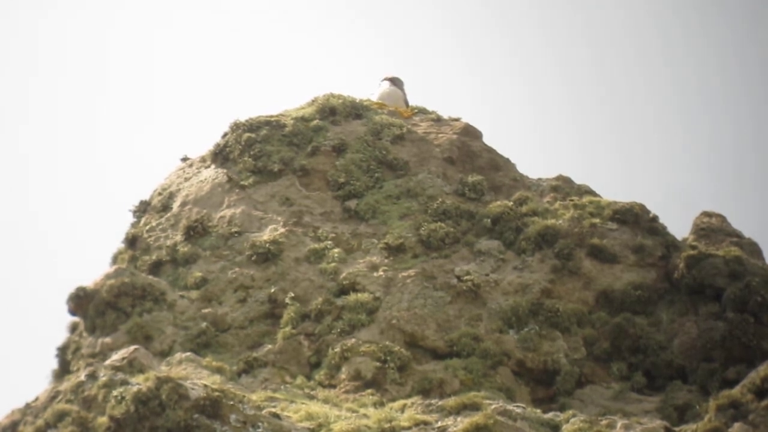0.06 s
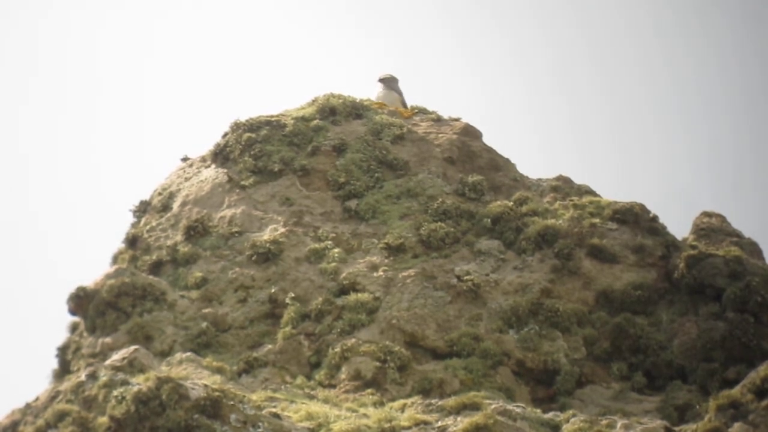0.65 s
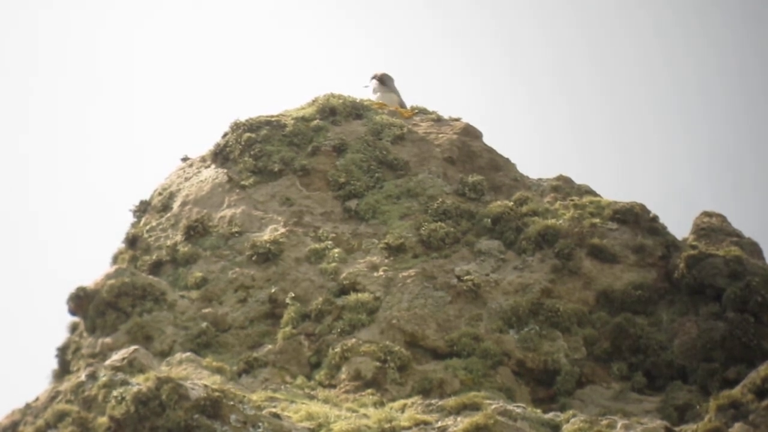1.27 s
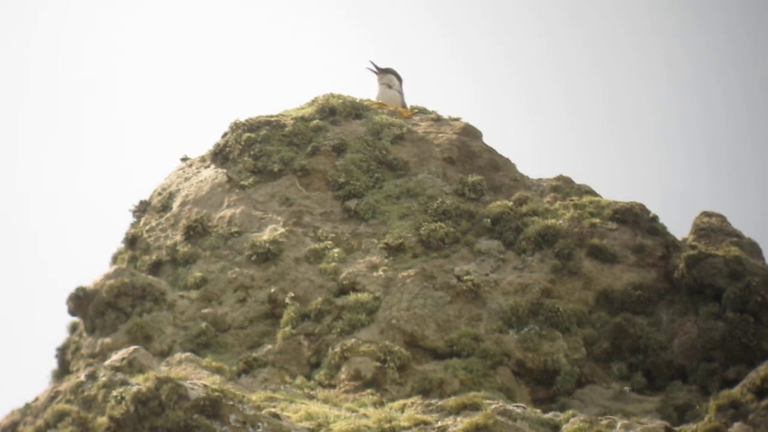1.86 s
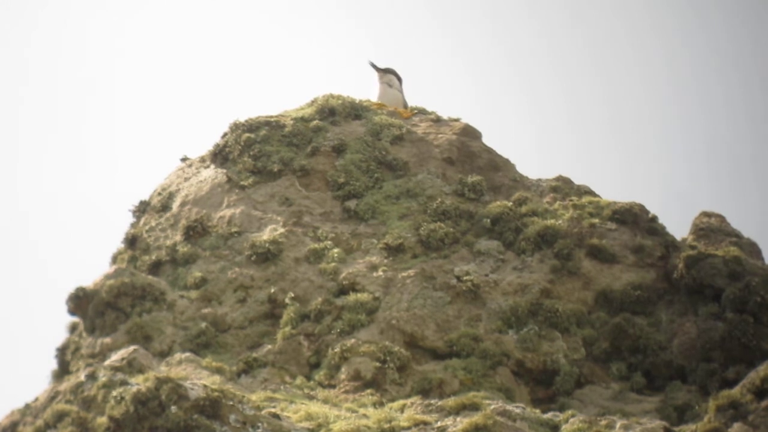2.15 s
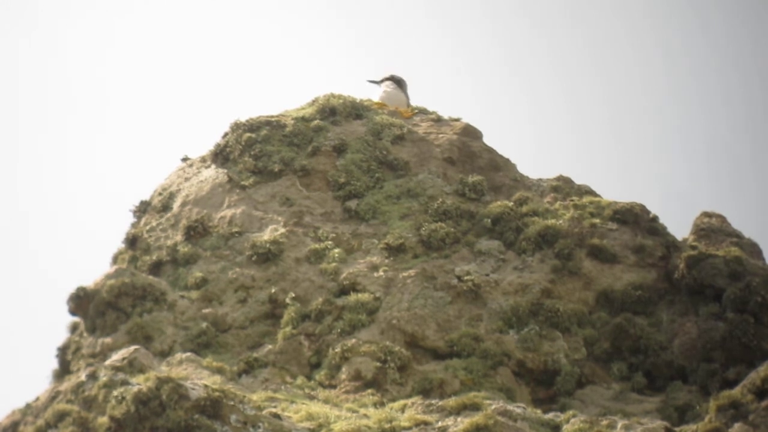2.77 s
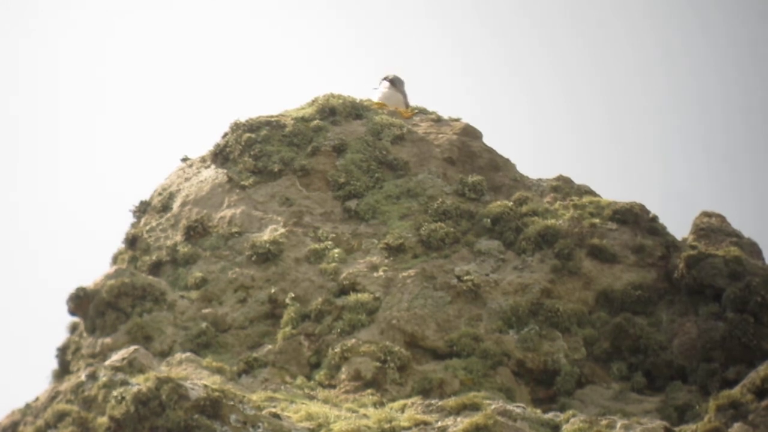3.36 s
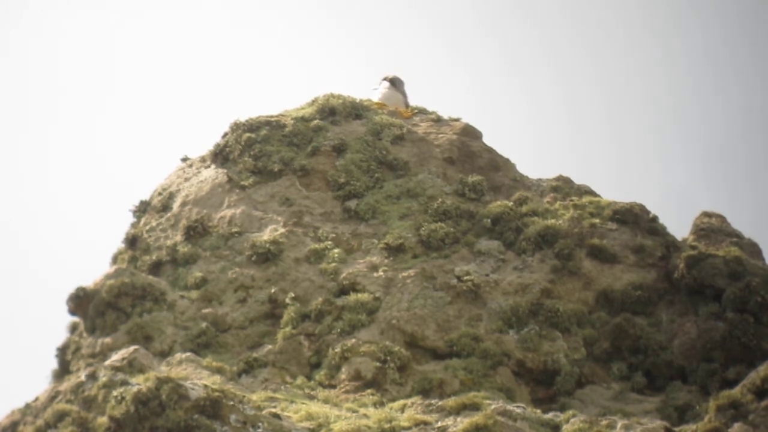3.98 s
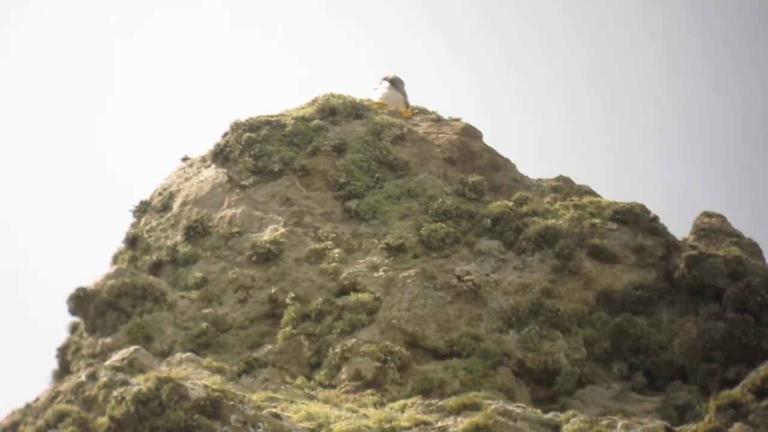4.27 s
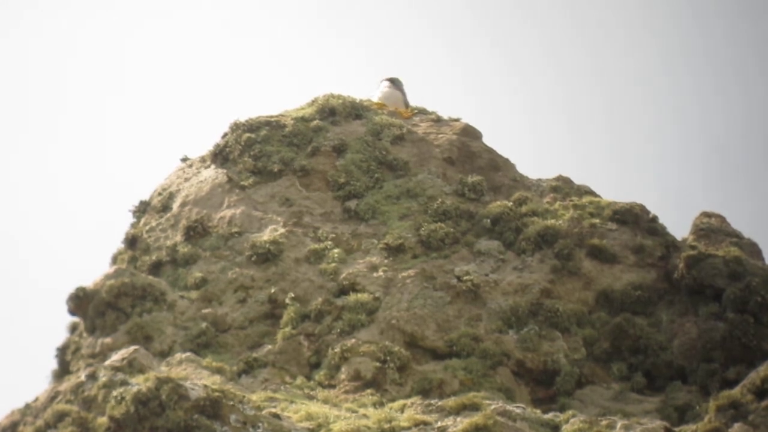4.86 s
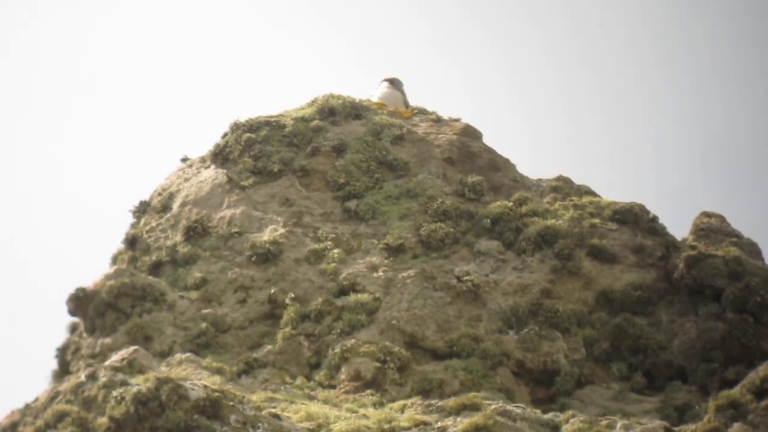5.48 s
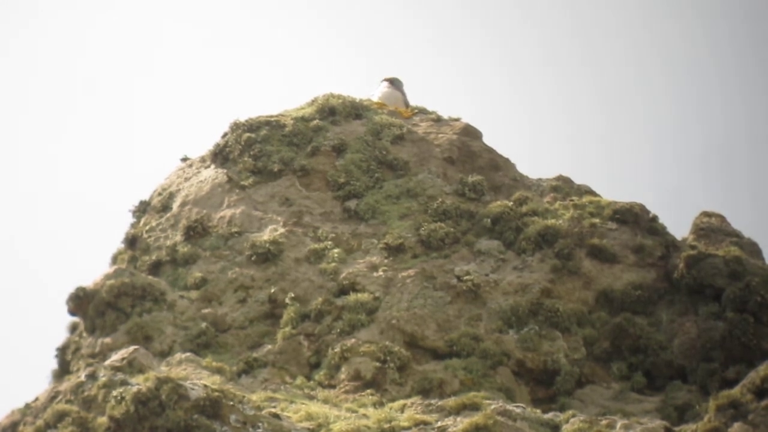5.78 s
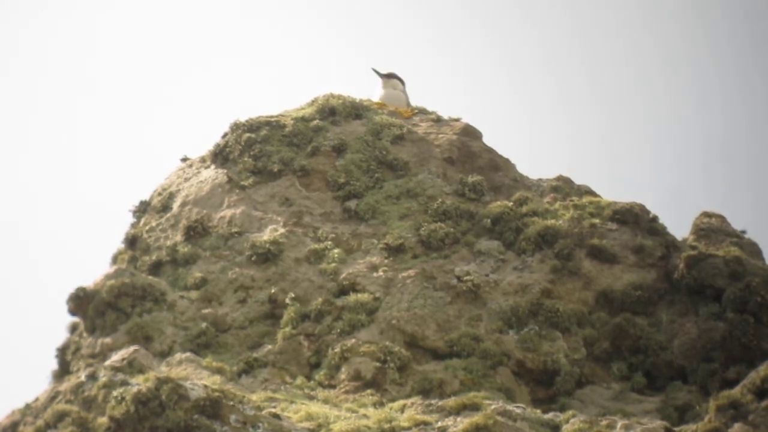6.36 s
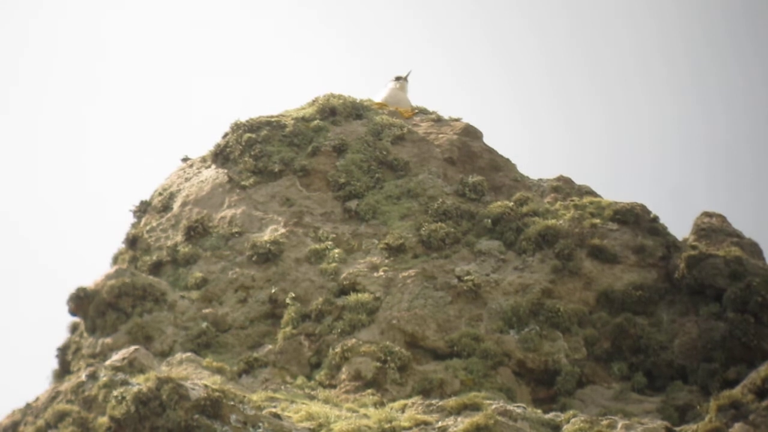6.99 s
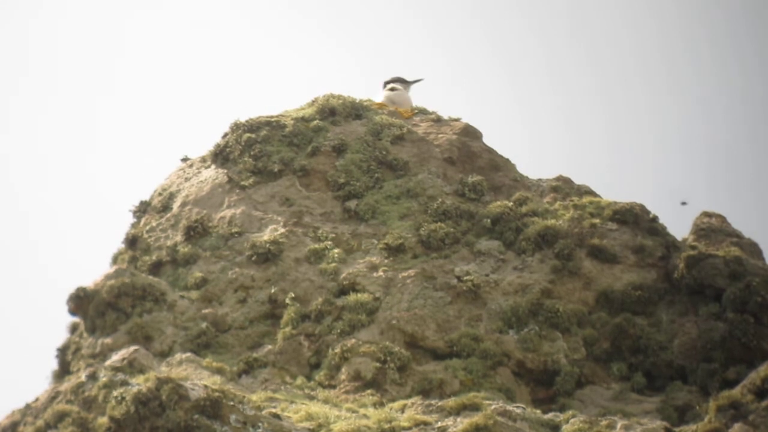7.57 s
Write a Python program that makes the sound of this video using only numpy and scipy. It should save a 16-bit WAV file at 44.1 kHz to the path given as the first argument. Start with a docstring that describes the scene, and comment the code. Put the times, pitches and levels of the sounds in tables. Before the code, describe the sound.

Eight quick, clear bird whistles, then faint faraway chirps, amid gusty wind rumble, softly rushing water and a few sharp camera clicks.

```python
"""Rock nuthatch above a stream

A rock nuthatch on a boulder whistles eight near-sine notes; small birds answer faintly from far off.
A stream rushes down the valley, and gusts buffet the microphone ports with a lumpy rumble.
The hand-held camera clicks, its body ringing, and a sleeve rustles over a bed of hiss.
Gain control ducks after the loudest clicks."""
import sys
import numpy as np
from scipy import signal
from scipy.fft import rfft, irfft, next_fast_len
from scipy.io import wavfile
from scipy.ndimage import uniform_filter1d

SR = 44100
rng = np.random.default_rng(int(sys.argv[2]) if len(sys.argv) > 2 else 0)


def waveform_to_disk(signal):
    """Save audio, clipped to [-1, 1], as 16-bit WAV at the path in sys.argv[1]."""
    frames = np.transpose(np.atleast_2d(signal))
    scaled = np.clip(frames, -1, 1) * 32767
    samples = np.round(scaled).astype(np.int16)
    wavfile.write(sys.argv[1], SR, samples)


N = 340893
TIME = np.arange(N) / SR

# nuthatch notes: (start of hold [s], pitch [Hz], drift over hold [Hz], level at end of hold [dB],
# swell over hold [dB], lead-in chip [dB], left over right [dB])
NOTES = [(.815, 3580, 0, -58.5, -2, -73, 2), (1.038, 3420, -150, -45.5, -0.5, -52, 0.5),
         (1.277, 3216, -90.5, -48.5, -3.5, -50.5, 2), (1.509, 3230, -100, -43, 5.5, -46, 1),
         (1.741, 3280, -110, -39.5, 8, -47.5, -3.5), (1.972, 3183, 63.5, -35, 3.5, -38, -2),
         (2.204, 3240, 136, -37, 2.5, -38.5, -0.5), (2.445, 3170, 110.5, -45, -2, -48.5, .5)]
# the lead-in chip: its pitch ceiling, its pitch at its loudest, and its timing
CHIP_TOP_HZ, CHIP_HZ, CHIP_LEAD_S, CHIP_FALL_S, CHIP_WIDTH_S = 3396, 2754, .064, .017, .0041
SLACK_HZ, SLACK_DB, SLACK_FADE_S = 1475, -9, .028  # after the chip the syrinx goes slack
RISE_LEAD_S, RISE_S, ATTACK_S = .013, .004, .0089  # the sweep up into the whistle
HOLD_S, SAG_HZ, RELEASE_S = .066, 68.6, .003  # the held whistle sags in the middle
FLICK_HZ, FLICK_S = 270, .008  # the closing flick: height at end of hold, time constant
# far birds' slurs: (time [s], length [s], start [Hz], middle [Hz], end [Hz], level [dB])
FAR_SLURS = [(2.525, .045, 4620, 4630, 4560, -63), (2.69, .5, 4660, 4330, 4250, -64),
             (4.14, .15, 1600, 1700, 1800, -54), (4.62, .07, 1700, 1780, 1700, -55),
             (6.92, .07, 2350, 2230, 2200, -54), (7.23, .055, 3800, 2900, 2200, -60),
             (7.48, .09, 2500, 3100, 3550, -62)]
# far birds' arched twitters: (apex time [s], half length [s], apex [Hz], depth [Hz], level [dB])
FAR_TWITTERS = [(5.48, .03, 4100, 500, -63), (5.652, 0.035, 4020, 490, -54.5),
                (5.834, .036, 4190, 736, -51.5), (6.148, .026, 4530, 1710, -54),
                (6.61, .024, 4540, 1510, -53), (6.731, 0.029, 4350, 1390, -54)]
# faint high smears, like echoes of a distant call: (peak time [s], width [s], level [dB])
FAR_CALL_ECHOES = [(.89, .03, -61), (1.23, 0.037, -57.5), (1.36, 0.03, -51.5), (1.55, 0.14, -57.5),
                   (7.0, 0.32, -63.5)]
# their tone: (frequency [Hz], level [dB])
FAR_ECHO_COLOUR = [(1500, -27), (3000, -2), (4200, 0), (5000, 0), (6200, -31), (9000, -56)]

# camera clicks: (time [s], level [dB], tilt [dB/octave], top edge [Hz], decay time constant [s])
CLICKS = [(0.334, -38, 1, 10900, 0.0021), (0.4064, -29, 2, 13000, 0.0069), (0.414, -16, 0.5, 13500, 0.0047),
          (0.4158, -16.5, -1.5, 12100, 0.0038), (0.438, -39, -1, 12000, 0.0049),
          (0.6344, -31, -0.5, 13000, 0.0021), (1.1958, -28.5, -5.5, 6500, 0.00037),
          (1.2725, -28.5, -6.5, 6460, 0.00045), (1.294, -32.5, -5, 6000, 0.0015),
          (1.31, -35, -6, 6000, 0.0014), (1.335, -30.5, -15, 6000, .001), (1.721, -32, 10, 8540, 0.0014),
          (2.2305, -6.5, 6.5, 13200, 0.0012), (2.232, -19, -3, 9200, 0.0035),
          (2.2345, -15, -6, 8900, 0.0011), (2.494, -29, 4, 3020, 0.00076), (3.494, -32, -4, 4450, 0.0016),
          (3.693, -45.5, 12, 7450, .002), (4.008, -29, -8, 1810, 0.0018),
          (5.7654, -38.5, -6.5, 6500, 0.005), (7.024, -36, -6.5, 5490, 0.00089),
          (7.101, -37, -6, 5500, 0.00075)]
# tone of a click: (frequency [Hz], level [dB])
CLICK_COLOUR = [(100, -24), (700, -15), (1300, -6.5), (2300, -0.5), (3200, -2.5), (4300, -1), (5600, -1.5),
                (6600, -0.5), (7600, -11), (9500, -6), (12300, -3.5), (14000, -11), (16000, -18.5)]
# resonances of the camera body: (frequency [Hz], width [Hz], level [dB])
BODY_MODES = [(1565, 50, 16), (2300, 110, 0), (4440, 140, 2), (5350, 160, 1), (5760, 140, 0),
              (6500, 160, -3), (10400, 300, -5)]

# gusts on the ports: (peak time [s], rise [s], fall [s], level [dB], left over right [dB])
GUSTS = [(.8, .22, 0.25, -39.5, -17), (1.63, .03, .17, -46, 0), (3.02, 0.1, .09, -34.5, -12.5),
         (3.24, .03, .04, -43.5, -13.5), (3.65, .03, .1, -39.5, -5), (3.98, .03, 0.062, -25, 4),
         (4.2, .035, .07, -33, -0.5), (4.55, 0.019, .04, -35, 6), (4.74, 0.088, .19, -39, -3),
         (5.25, .03, .08, -43, -3), (6.45, 0.038, .3, -41.5, 4), (7.0, 0.055, 0.057, -31.5, 2.5),
         (7.17, .025, 0.068, -33, 0), (7.43, 0.066, .16, -38.5, -1)]
# single eddies that hit one port: (time [s], level [dB], time scale [s], port)
BUFFETS = [(.587, -21.5, 0.003, "left"), (0.829, -23, 0.0022, "right"), (1.123, -19.5, 0.0038, "right"),
           (1.45, -27, 0.0038, "right"), (2.201, -26, 0.0028, "left"), (2.987, -17.5, 0.001, "right"),
           (3.04, -19.5, 0.0023, "right"), (3.781, -19, 0.0017, "left"), (3.9539, -8.5, .0011, "left"),
           (3.968, -11, .0015, "left"), (4.023, -15, .0015, "right"), (4.212, -18, 0.0018, "right"),
           (6.518, -20.5, 0.0035, "right"), (7.0, -21, 0.00094, "left"), (7.02, -16, .002, "left")]
# tone of slow pressure swings and of small fast eddies: (frequency [Hz], level [dB])
RUMBLE_COLOUR = [(15, -20), (35, -7.5), (60, 1), (110, -16.5), (180, -28.5), (400, -42.5), (4000, -88)]
EDDY_COLOUR = [(20, -16), (70, 4.5), (115, 3), (170, -3.5), (280, -12), (500, -23), (1200, -58),
               (4000, -87)]

# soft slides of the sleeve: (peak time [s], width [s], level [dB])
RUSTLES = [(.19, 0.24, -57), (.62, 0.057, -52), (1.32, 0.052, -55), (1.623, 0.11, -54.5),
           (3.518, 0.099, -50.5), (5.477, 0.049, -54.5), (5.88, 0.2, -58.5), (6.22, 0.1, -48),
           (6.456, 0.065, -51.5), (7.614, 0.036, -54)]
# tone of the slides and of a gritty scuff: (frequency [Hz], level [dB])
RUSTLE_COLOUR = [(300, -36), (1500, 6), (3000, 2.5), (5000, 2), (6000, -3.5), (7500, -9), (10000, -6),
                 (12300, -8), (14000, -14), (16000, -36)]
GRIT_COLOUR = [(500, -25), (1300, -4), (2500, 10), (4000, -12), (6000, -10), (7500, -23), (12000, -30)]

# the stream, carried on the air: (time [s], deep roar [dB], bright rush [dB])
STREAM_LEVELS = np.vstack([[(0.0, -56.5, -49), (1.27, -52, -50.5), (1.89, -49, -45), (2.08, -48.5, -47),
                 (2.2, -52, -47.5)], [(2.65, -54, -46), (2.83, -55, -46.5), (3.13, -54.5, -48),
                 (4.08, -50.5, -48), (5.1, -51, -48), (5.49, -49, -51.5), (6.09, -54, -50),
                 (6.57, -53.5, -51), (6.98, -54.5, -51), (7.73, -54, -51.5)]])
# tone of the roar, the rush and the hiss bed: (frequency [Hz], level [dB])
ROAR_COLOUR = [(20, 7), (120, -15.5), (280, -4.5), (400, -3), (540, 1), (700, -2), (1000, -8), (3000, -38),
               (8000, -67.5)]
RUSH_COLOUR = [(100, -28.5), (500, -14), (800, -3.5), (1050, 0.5), (1400, -6.5), (2000, -11.5), (2600, -24),
               (4000, -41), (8000, -58.5)]
HISS_COLOUR = [(100, 14), (2500, 5), (4000, 2), (5500, -0.5), (7500, -7), (10500, -5), (13000, -8.5),
               (15800, -11)]
# stereo image of the stream and of diffuse noise: (frequency [Hz], left-right likeness [0-1])
STREAM_IMAGE = [(50, 1), (250, 0.84), (450, 0.85), (1050, 0.79), (1500, 0.71), (2200, 1), (3000, 0.26)]
WIDE_IMAGE = [(20, 0.067), (16000, 0.046)]


def nuthatch(level_db=1, jitter=.0072, rasp=.06, flutter_db=3.9):
    """Each note: a falling chip, a hush, a fast rise, a held whistle and an upward flick."""
    out, t = np.zeros((2, N)), np.arange(-.08, .08, 1 / SR)
    waver, flutter, shake = jitter * wander(160), flutter_db * wander(60), wander(600)
    held, risen = np.clip(t / HOLD_S, 0, 1), step(t + RISE_LEAD_S, RISE_S)
    since_chip = t + CHIP_LEAD_S
    falling = np.minimum(SLACK_HZ + (CHIP_HZ - SLACK_HZ) * np.exp(-since_chip / CHIP_FALL_S), CHIP_TOP_HZ)
    scoop = FLICK_HZ * np.exp((t - HOLD_S) / FLICK_S) - SAG_HZ * np.sin(np.pi * held)
    slack = amp(SLACK_DB) * step(since_chip, ATTACK_S) * np.exp(-since_chip / SLACK_FADE_S)
    chip = np.exp(-.5 * (since_chip / CHIP_WIDTH_S) ** 2) + slack
    hold = step(t + RISE_LEAD_S, ATTACK_S) * step(HOLD_S - t, RELEASE_S)
    for s, pitch, drift, db, swell_db, chip_db, side_db in NOTES:
        now = np.round((s + t) * SR).astype(int)
        hz = (1 - risen) * falling + risen * (pitch + drift * held + scoop)
        effort = amp(chip_db) * chip + amp(db + swell_db * (held - 1)) * hold
        # the slack syrinx rasps in the low sweeps, and the throat dulls them
        rough_hz = hz * (1 + waver[now] + rasp * (1 - risen) * shake[now])
        throat = 1 / np.sqrt(1 + (1750 / hz) ** 8)
        add(out, s + t[0], pan(side_db) * effort * throat * whistle(rough_hz, flutter[now]))
    # the boulder doubles the sweeps within a few milliseconds; rocks and valley answer later
    boulder = amp(-7) * reverb(out, t60=.019, delay=.0016)
    rocks = amp(-13) * reverb(out, t60=.2, delay=.0029)
    valley = amp(-19) * reverb(out, t60=.83, delay=.022)
    return amp(level_db) * (out + boulder + rocks + valley)


def whistle(hz, db):
    """The syrinx: a near sine with a very weak octave."""
    phase = 2 * np.pi * np.cumsum(hz) / SR
    return np.sqrt(2) * amp(db) * (np.sin(phase) + amp(-42) * np.sin(2 * phase))


def far_birds(level_db=-3, arch_power=1.8, apex_break_s=.008, downstroke_db=-5):
    """Thin distant slurs and twitters, blurred by the rocks and wet with the echo of the slopes."""
    out = np.zeros((2, N))
    for s, length, *pitch, db in FAR_SLURS:
        u = np.linspace(0, 1, int(length * SR))
        hz = np.polyval(np.polyfit([0, .5, 1], pitch, 2), u)
        envelope = np.interp(u, [0, .15, .5, 1], [0, 1.1, 1, 0])
        add(out, s, pan(0) * envelope * whistle(hz, db))
    for s, half, apex, depth, db in FAR_TWITTERS:
        u = np.linspace(-1, 1, int(2 * half * SR))
        hz = apex - depth * abs(u) ** arch_power
        envelope = (1 - u ** 4) * (1 - np.exp(-(u * half / apex_break_s) ** 2))
        add(out, s - half, pan(0) * envelope * whistle(hz, db + downstroke_db * (u > 0)))
    rocks = amp(-5) * reverb(out, t60=.054, delay=.0011)
    slopes = amp(-3) * reverb(out, t60=3.3, delay=.012)
    return amp(level_db) * (out + rocks + slopes)


def far_call_echoes(level_db=-1, grain_db=1.5):
    """A faint smeared high band, like the echo of a distant bird call."""
    band = noise(FAR_ECHO_COLOUR, WIDE_IMAGE, 3.5)
    return amp(level_db + grain_db * wander(250)) * swells(FAR_CALL_ECHOES) * band


def camera_clicks(centre=.61, crack=.88, side_db=2, tail_db=-19, full_ring_s=.003):
    """A sharp crack and a short chatter ring the camera body, close to both ports."""
    out, size = np.zeros((2, N)), 4096
    t, hz = np.arange(size) / SR, np.fft.rfftfreq(size, 1 / SR)
    modes = sum(amp(db) / (1 + 2j * (hz - f) / width) for f, width, db in BODY_MODES)
    octaves = np.log2(np.maximum(hz, 1300) / 4000)
    for s, db, tilt_db, top_hz, decay in CLICKS:
        shared, *own = rng.standard_normal((3, size))
        snap = (centre * shared + np.array(own)) * np.exp(-t / decay)
        snap[:, 0] = crack * np.linalg.norm(snap[0]) * min(1, .00225 / decay)  # brief clicks crack most
        eq = amp(read(CLICK_COLOUR, hz) + tilt_db * octaves) / np.sqrt(1 + (hz / top_hz) ** 10)
        log_eq = np.log(np.r_[eq, eq[-2:0:-1]])
        minimum_phase = np.exp(np.conj(signal.hilbert(log_eq)))[:len(hz)]  # keeps the attack sharp
        body = 1 + min(1, decay / full_ring_s) * modes  # a longer chatter rings the body more
        click = irfft(rfft(snap) * minimum_phase * body)
        click /= np.linalg.norm(click, axis=1, keepdims=True)
        add(out, s, amp(db) * np.sqrt(decay * SR) * click)
    return pan(side_db) * (out + amp(tail_db) * reverb(out, t60=.21, delay=.007))


def wind(rumble_db=-4, eddy_db=-3, rumble_follow=.83, lumps_db=4.5):
    """Lumpy rumble at each port that brightens in gusts."""
    gust_db = gusts()
    usual_db = np.median(gust_db)
    rumble_gain = amp(rumble_db + usual_db + rumble_follow * (gust_db - usual_db)) * pan(-2)
    rumble = rumble_gain * noise(RUMBLE_COLOUR, WIDE_IMAGE, .89)
    lumps = amp(lumps_db * np.array([wander(25), wander(25)]))
    eddies = unit(lumps * noise(EDDY_COLOUR, WIDE_IMAGE, 1))
    return rumble + amp(eddy_db + gust_db) * eddies


def gusts(calm_db=-65, calm_side_db=-7):
    """Wind envelope in dB at each port: gusts build and die away exponentially over light air."""
    power = (amp(calm_db) * pan(calm_side_db)) ** 2
    for s, rise, fall, db, side_db in GUSTS:
        envelope = np.exp(-np.maximum((s - TIME) / rise, (TIME - s) / fall))
        power = power + (amp(db) * pan(side_db) * envelope) ** 2
    return 10 * np.log10(power)


def buffets(level_db=-2.5, far_port_db=-24.5):
    """Single eddies push and pull at one port and barely reach the other."""
    out = np.zeros((2, N))
    for s, db, scale, port in BUFFETS:
        u = np.arange(-4 * scale, 4 * scale, 1 / SR) / scale
        push = np.sin(2 * u + rng.uniform(-1.05, 1, (2, 1))) * np.exp(-abs(u) / 2) * np.hanning(len(u))
        far = np.array([[port != "left"], [port != "right"]])
        add(out, s - 4 * scale, amp(db + level_db + far_port_db * far) * push)
    return out


def sleeve(level_db=-2, grain_db=1.5):
    """Cloth slides in soft, grainy swells."""
    cloth = noise(RUSTLE_COLOUR, [(20, .5), (16000, .5)], 1.4)
    return amp(level_db + grain_db * wander(250)) * swells(RUSTLES) * cloth


def scuff(time_s=1.308, width_s=.026, level_db=-48, grain_db=4.5):
    """A short gritty scuff close to the ports."""
    envelope = swells([(time_s, width_s, level_db)]) * unit(amp(grain_db * wander(400)))
    return envelope * noise(GRIT_COLOUR, [(20, .7), (16000, .55)], 1)


def stream(roar_db=3, rush_db=2):
    """Distant rushing water; its roar and its brighter rush swell and fade on the air."""
    s, *levels = np.transpose(STREAM_LEVELS)
    roar_gain, rush_gain = (amp(np.interp(TIME, s, db)) for db in levels)
    roar = amp(roar_db) * roar_gain * noise(ROAR_COLOUR, STREAM_IMAGE, 1.4)
    rush = amp(rush_db) * rush_gain * noise(RUSH_COLOUR, STREAM_IMAGE, 1.5)
    return pan(-.5) * (roar + rush)


def hiss(level_db=-54, fizz_db=-71, first_s=.85, width_s=.074):
    """Even hiss, with a faint high fizz once a second."""
    from_beat = (TIME - first_s + .5) % 1 - .5
    pulse = np.exp(-(from_beat / width_s) ** 2)
    fizz = noise([(9000, -50), (10300, -6), (10900, 4), (12000, -50)], [(20, .9), (16000, .51)], 1)
    return amp(level_db) * noise(HISS_COLOUR, WIDE_IMAGE, 1) + amp(fizz_db) * pulse * fizz


def noise(colour, image, patchy_db):
    """Stereo noise with a given tone and stereo image, and drifting patches of level."""
    hz = np.fft.rfftfreq(2048, 1 / SR)
    a, b, c, d, patches = rng.standard_normal((5, N // 512 + 5, len(hz)))
    patches = unit(uniform_filter1d(uniform_filter1d(patches, size=7, axis=0), size=16, axis=1))
    likeness = np.clip(read(image, hz), -1, 1)
    left = a + 1j * b
    right = likeness * left + np.sqrt(1 - likeness ** 2) * (c + 1j * d)
    spectra = np.array([left, right]) * amp(read(colour, hz) + patchy_db * patches)
    return unit(signal.istft(spectra.swapaxes(1, 2), nperseg=2048, noverlap=1536)[1][:, :N])


def reverb(x, t60, delay):
    """Many small reflections, different at each port, dying away; times in seconds."""
    t = np.arange(SR) / SR
    taps = rng.standard_normal((2, SR)) * np.exp(-np.log(1000) * t / t60) * (t > delay)
    return signal.oaconvolve(x, taps / np.linalg.norm(taps, axis=1, keepdims=True), axes=1)[:, :N]


def wander(rate_hz):
    """Smooth random motion of rms one."""
    size = next_fast_len(N, True)
    hz = np.fft.rfftfreq(size, 1 / SR)
    return unit(irfft(rfft(rng.standard_normal(size)) * np.exp(-(hz / rate_hz) ** 2), size))[:N]


def swells(rows):
    """Bell-shaped swells of gain."""
    return sum(amp(db) * np.exp(-.5 * ((TIME - s) / width) ** 2) for s, width, db in rows)


def step(t, width):
    """A smooth step from 0 to 1 around t = 0."""
    return .5 + .5 * np.tanh(.5 * t / width)


def amp(db):
    """Decibels to gain."""
    return 10 ** (np.asarray(db) / 20)


def unit(x):
    """Scales to an rms of one."""
    return x / np.sqrt(np.mean(x ** 2) + 1e-20)


def read(points, hz):
    """Joins table rows by straight lines on a log-frequency axis."""
    f, value = np.transpose(points)
    return np.interp(np.log(hz + 1), np.log(f + 1), value)


def pan(db):
    """Left and right gains for a level difference."""
    return amp([[db / 2], [-db / 2]])


def add(mix, s, sound):
    """Mixes a stereo sound in at time s."""
    part = mix[:, round(s * SR):][:, :sound.shape[1]]
    part += sound[:, :part.shape[1]]


def scene(lag_samples=4):
    """The birds are ahead; handling, far call echoes and stream reach the left port slightly sooner."""
    left, right = camera_clicks() + sleeve() + far_call_echoes() + scuff() + stream()
    from_left = np.array([left, np.pad(right, (lag_samples, 0))[:N]])
    return nuthatch() + far_birds() + from_left + wind() + buffets() + hiss()


def record(dry, low_cut_hz=38, notch_hz=8250, top_hz=15800, threshold_db=-20, slope=.7):
    """A low cut, a notch in the treble, gain control with slow recovery, a clipper and a band limit."""
    size = next_fast_len(N, True)
    hz = np.fft.rfftfreq(size, 1 / SR)
    eq = hz / np.hypot(hz, low_cut_hz) * amp(-38 * np.exp(-((hz - notch_hz) / 320) ** 2))
    shaped = irfft(rfft(dry, size) * eq, size)[:, :N]
    power_db = 10 * np.log10(signal.lfilter(np.ones(130) / 130, 1, (shaped ** 2).mean(0)) + 1e-12)
    release = 20 * TIME  # the held peak falls 20 dB a second
    peak_db = np.maximum.accumulate(power_db + release) - release
    over_db = np.maximum(peak_db - threshold_db, 0)
    attack = np.exp(-1 / (.0078 * SR))  # the gain falls just after the crack has passed
    ducked = shaped / amp(slope * signal.lfilter([1 - attack], [1, -attack], over_db))
    band_limit = signal.firwin(511, top_hz, window=("kaiser", 9), fs=SR)
    return signal.oaconvolve(np.clip(ducked, -.9, .9), band_limit[None], "same")


dry = scene()
out = record(dry)
waveform_to_disk(out)
```